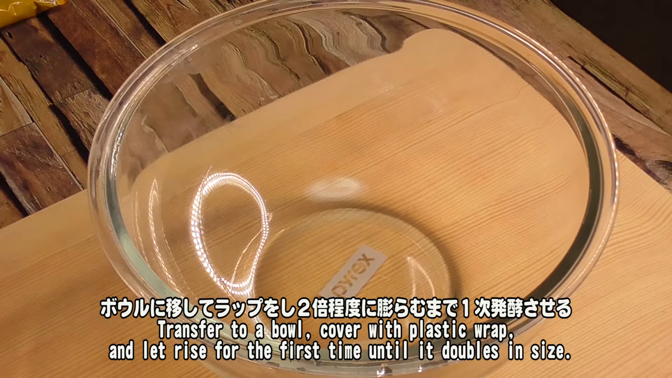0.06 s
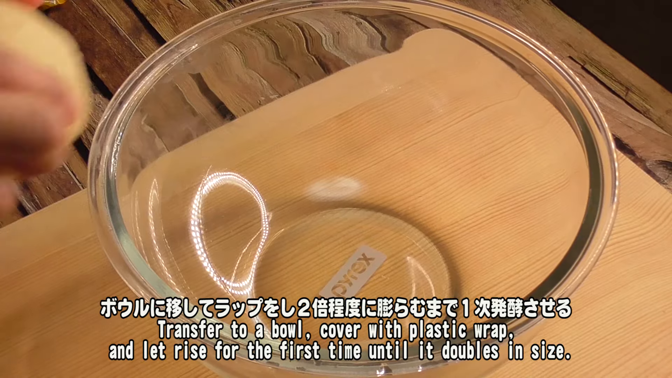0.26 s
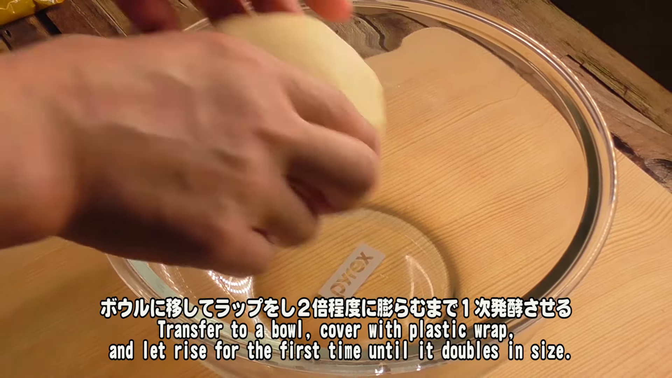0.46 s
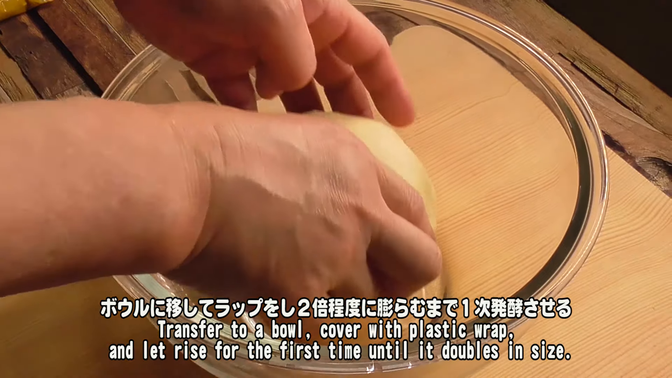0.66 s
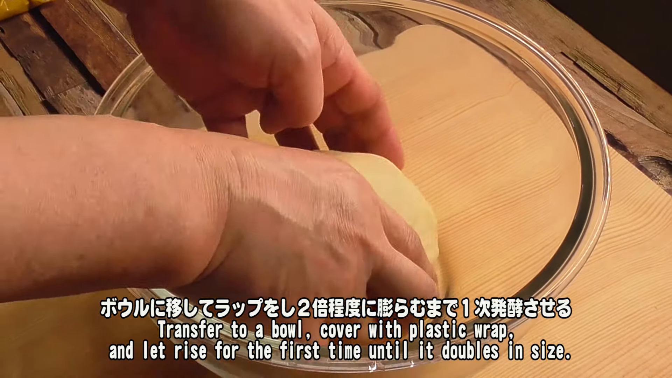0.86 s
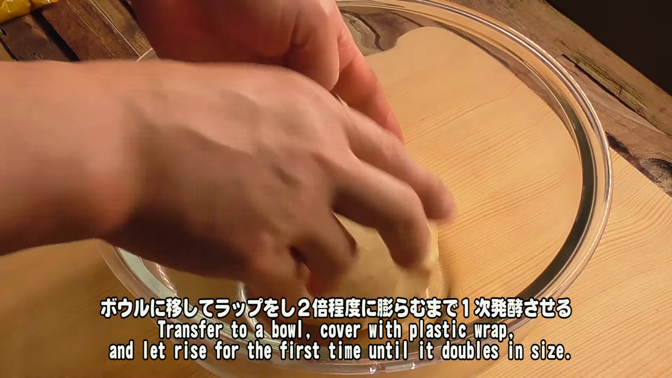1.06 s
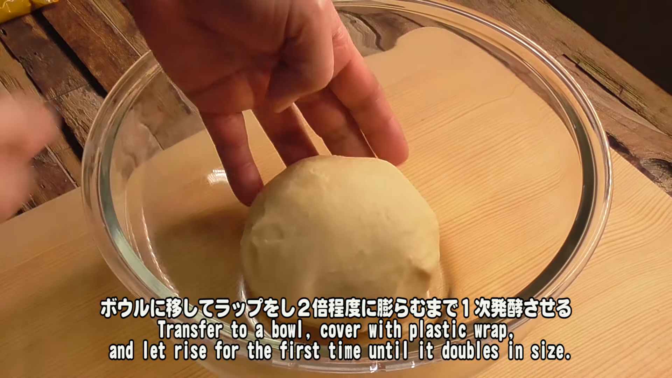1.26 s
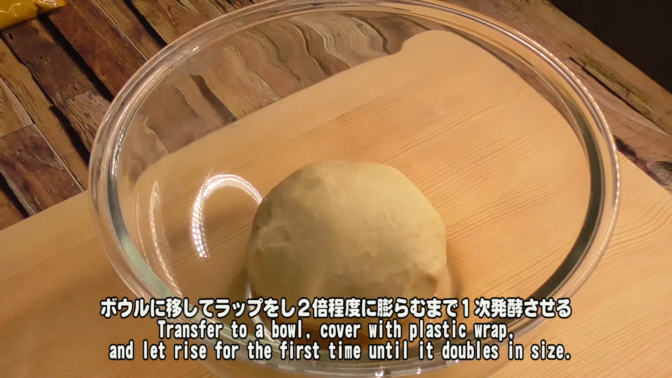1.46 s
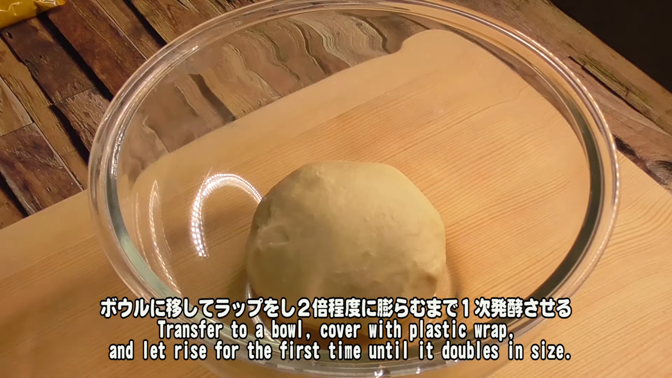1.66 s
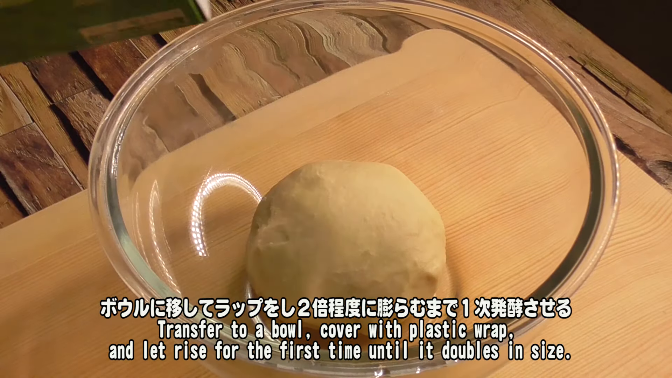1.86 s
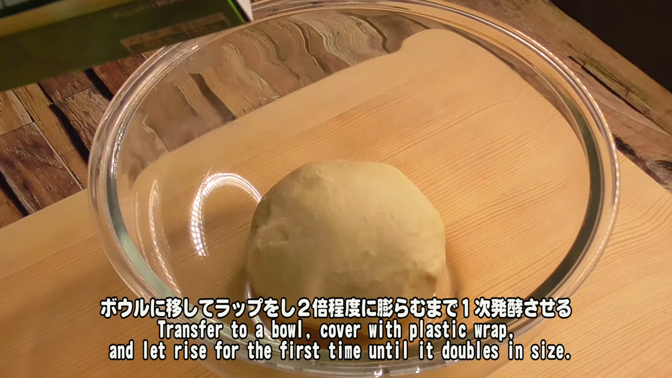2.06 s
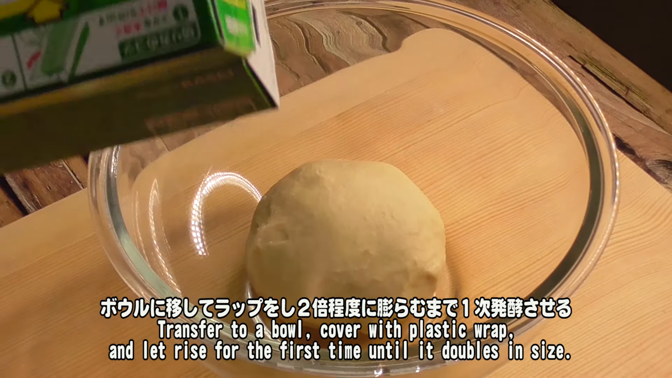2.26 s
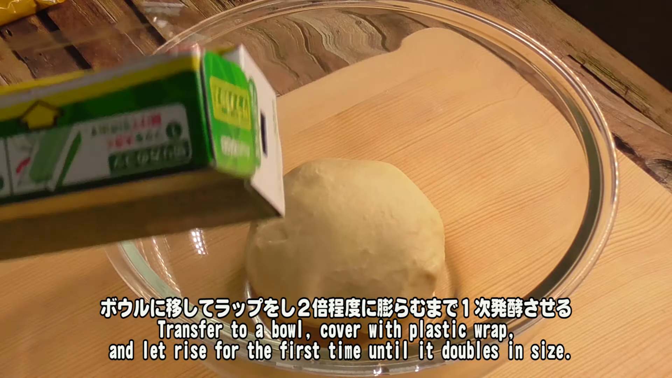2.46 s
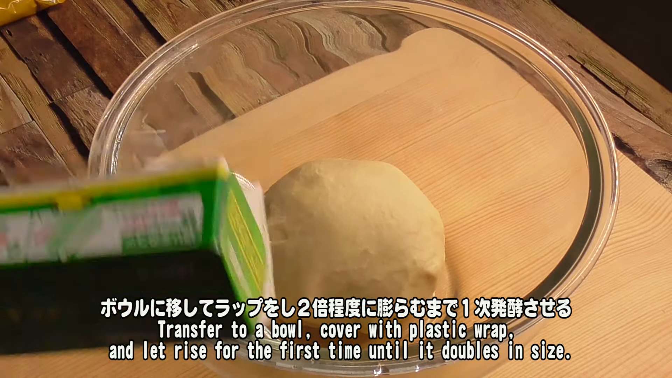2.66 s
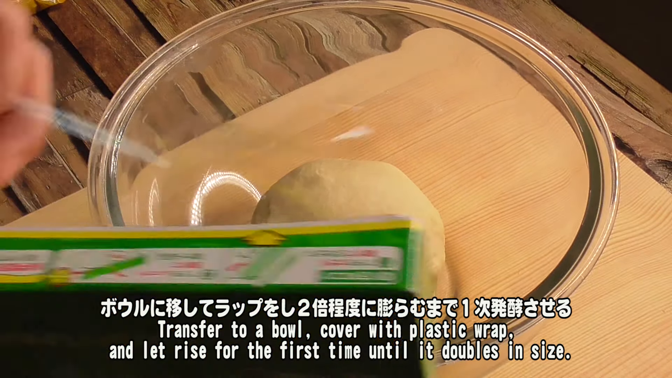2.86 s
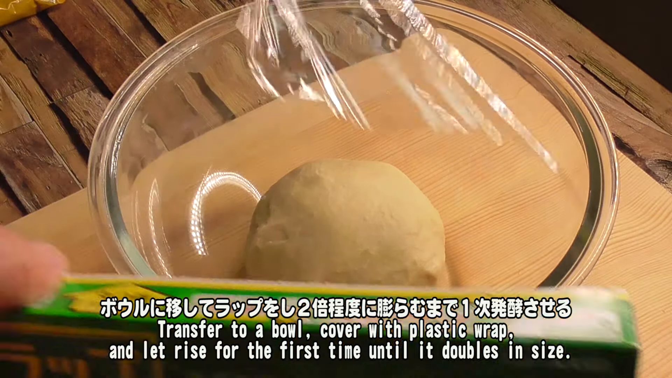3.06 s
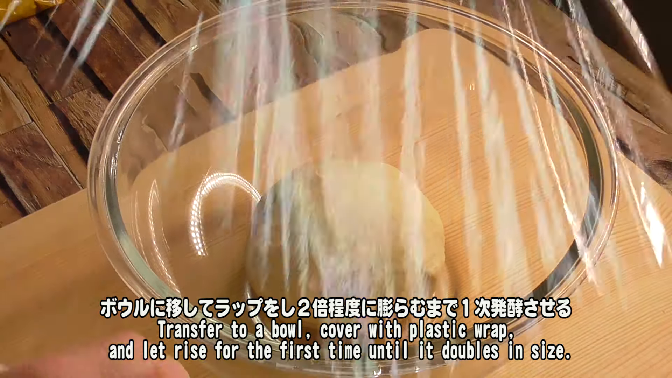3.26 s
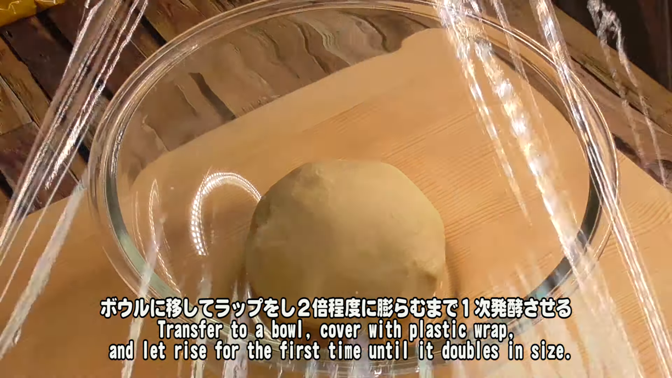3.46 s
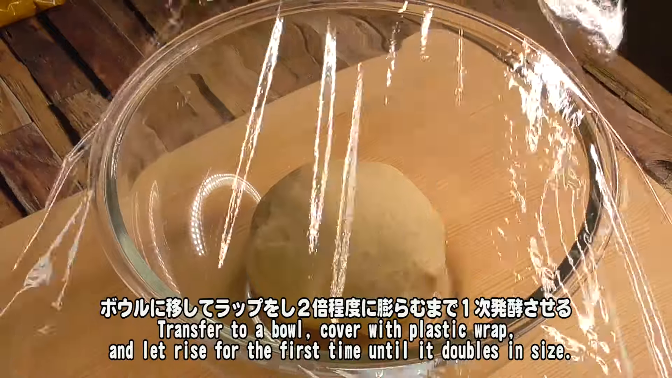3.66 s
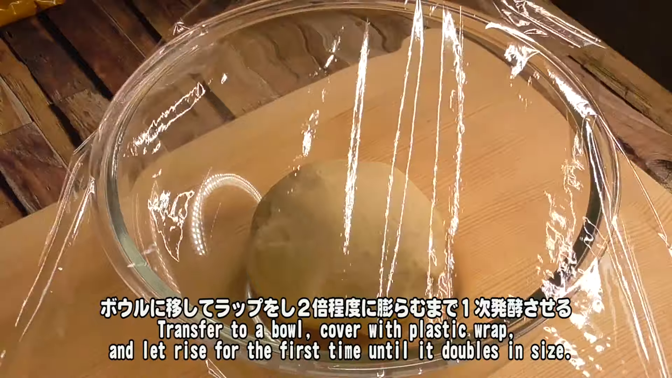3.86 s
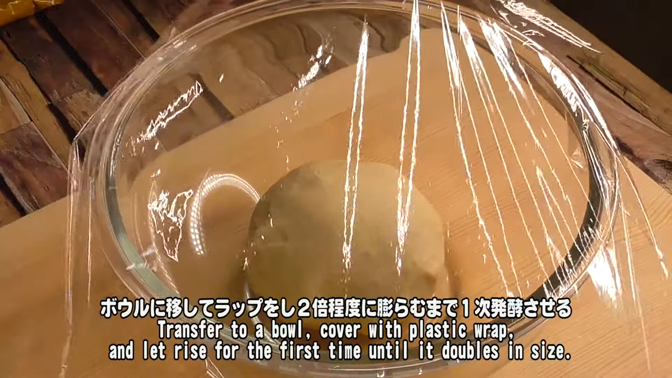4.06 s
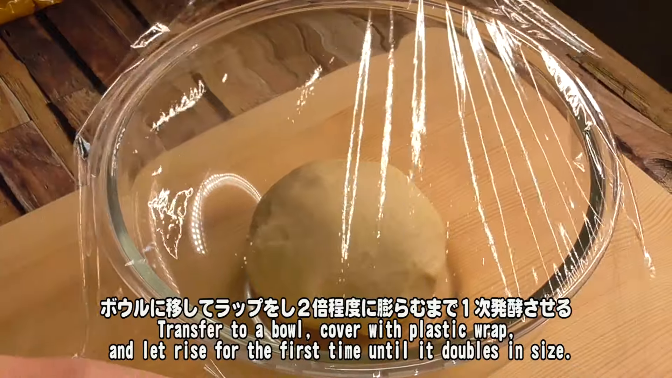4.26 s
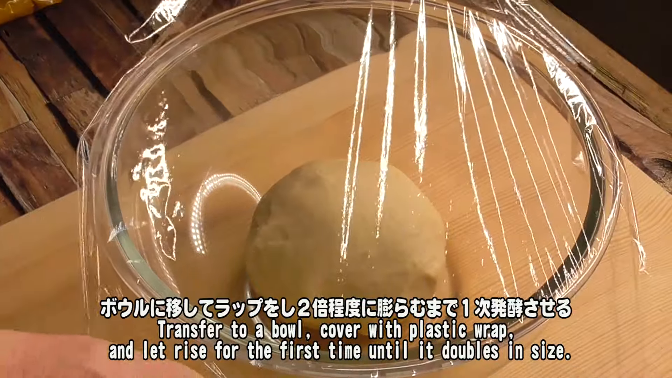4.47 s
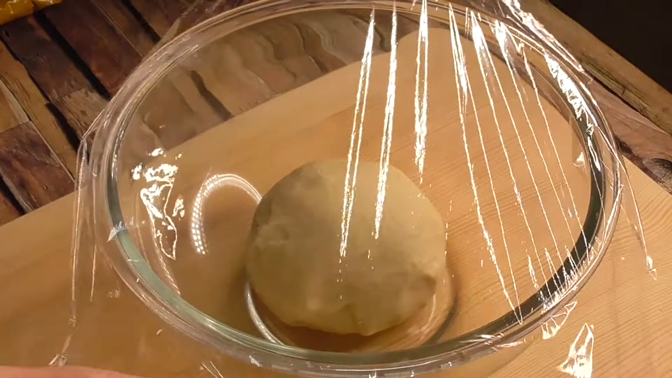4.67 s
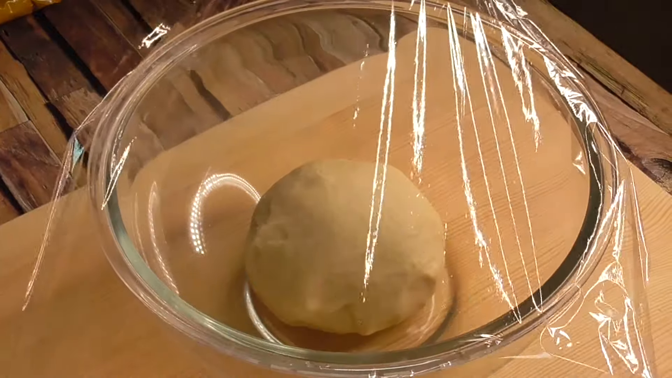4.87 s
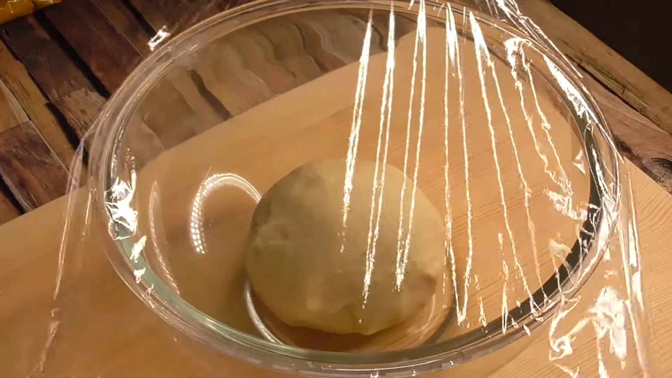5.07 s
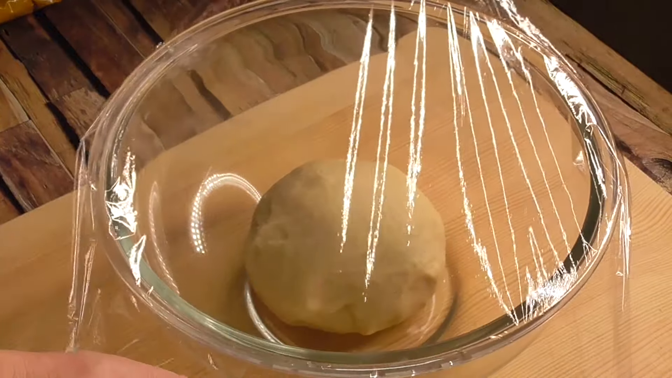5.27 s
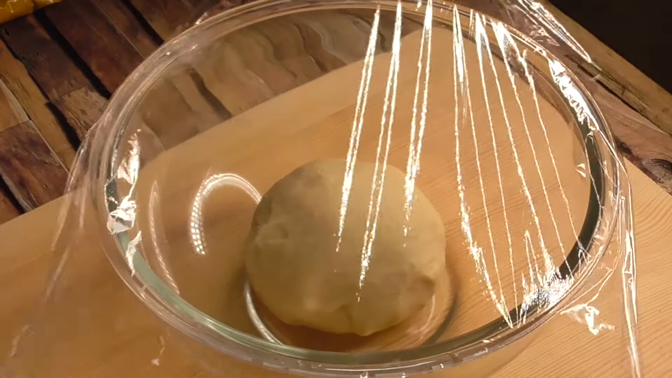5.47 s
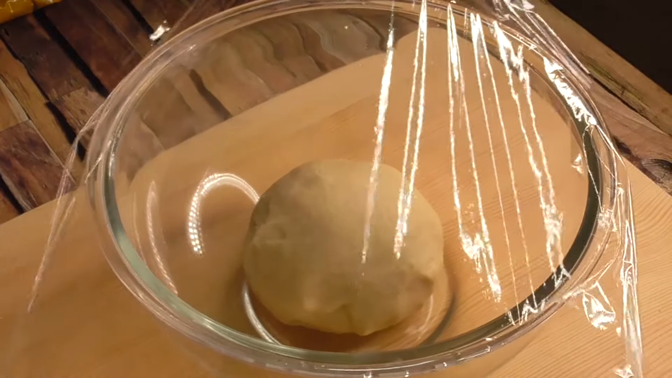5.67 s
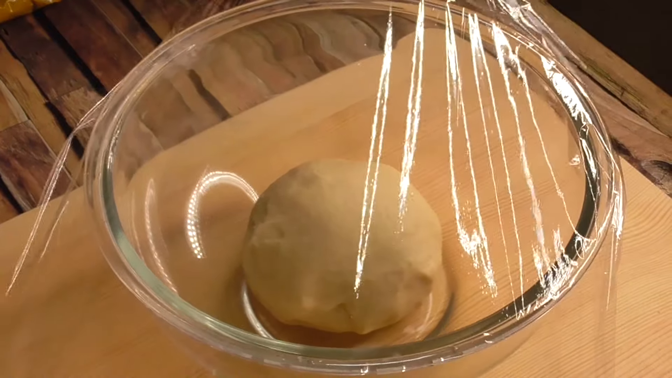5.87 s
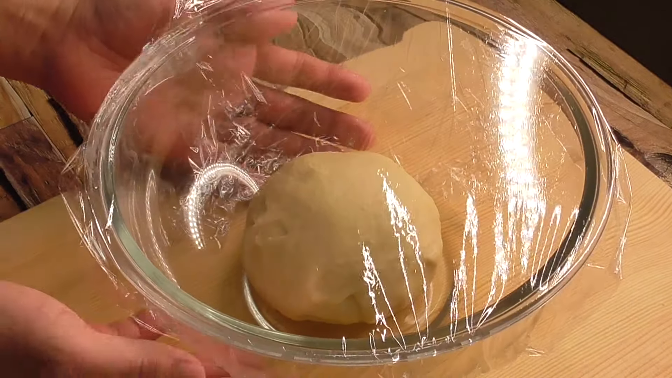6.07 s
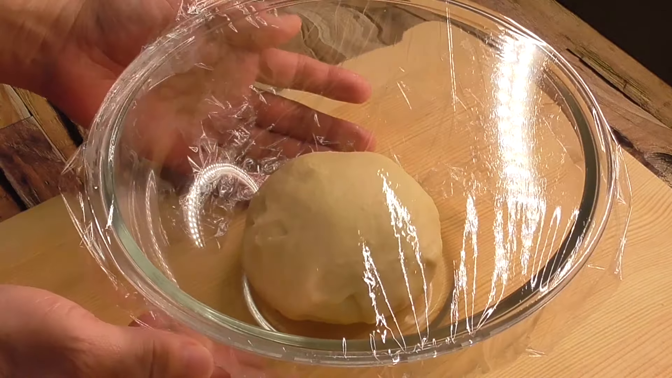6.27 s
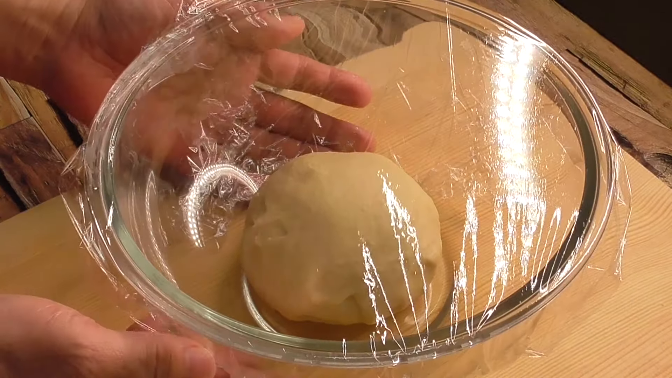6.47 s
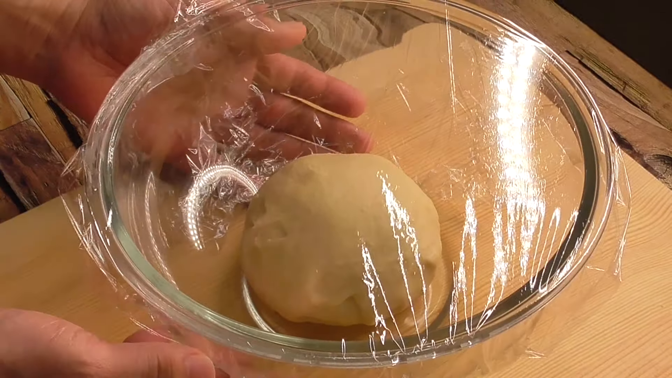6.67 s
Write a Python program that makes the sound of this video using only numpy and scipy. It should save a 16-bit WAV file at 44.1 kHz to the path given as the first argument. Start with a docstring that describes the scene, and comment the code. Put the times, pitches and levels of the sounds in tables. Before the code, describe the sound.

A quiet small kitchen with a low, soft room tone, miked closely in stereo. At 0.1 s there is a faint skin brush and soft knock; around 0.5 to 1.5 s a thin electrical buzz swells and fades, with a muffled dough bump at 0.85 s. From 1.47 s a card carton is gripped with hollow knocks and rustle, and at 2.33 s it flips open with a crack and short metallic ring. Film starts to pull at 2.45 s, then from 2.9 to 3.5 s peels in a dense, bright sizzling hiss whose tone rises and glides down. From 3.65 s come irregular crinkles and small pops, with a tighter cluster of cracks near 5 s. At 5.5 to 5.9 s the film rips loudly with sharp snaps and low thuds. Light crinkles follow at 6.05, 6.15 and 6.3 s, then near quiet with one tiny crackle at 6.7 s.

```python
"""A ball of dough is laid in a glass bowl on a wooden board: soft knocks of ringing modes and a brush of slips.
A faint electrical buzz of mains-rate ticks comes and goes, then a carton of cling film is picked up and flipped open.
The film peels off its roll with a dense hiss of tiny slips under a gliding sizzle band, crinkles as it is drawn
over the rim, rips along the cutter with sharp cracks, and crinkles last under smoothing palms.
Throughout, a quiet room of coloured noise lies below, and a small kitchen echoes the handling."""
import sys
import numpy as np
from scipy import signal
from scipy.fft import rfft, irfft, next_fast_len
from scipy.io import wavfile

SR = 44100
rng = np.random.default_rng(int(sys.argv[2]) if len(sys.argv) > 2 else 0)


def int16_out(signal):
    """Quantize to a 16-bit WAV file."""
    q = np.round(np.clip(np.atleast_2d(signal).T, -1, 1) * 32767)
    wavfile.write(sys.argv[1], SR, q.astype(np.int16))


N = 296098
TIME = np.arange(N) / SR
STEPS = np.arange(0, TIME[-1], .001)  # coarse clock for hand movements, s
BLOW_S = .005  # blow levels are stated as if the energy were packed into this time
PULL_SLIPS_PER_S = 11000  # at full peeling speed

# modes of the thud of a struck body: f/multiple of its pitch, width/Hz, level/dB
THUD_MODES = [(.5, 45.3, -6.5), (.78, 48.6, 1.5), (1, 49.7, 3), (1.35, 58.7, -1)]
# spectrum of crinkling film and of sliding skin: f/Hz, level/dB per Hz
CRINKLE_SPECTRUM = [(1800, -12.5), (2800, -8), (3600, -2), (4600, 0), (5700, -3), (7200, -0.5), (9000, -2),
                    (10500, -6), (13000, -7.5), (15500, -19)]


def from_db(db):
    """Decibels to gain."""
    return np.exp(np.asarray(db) * (np.log(10) / 20))


def rms_one(x):
    """Scale to rms 1."""
    return x / np.sqrt(np.mean(x ** 2) + 1e-20)


def in_time(rows):
    """One curve over the scene for each column after the time."""
    s, *columns = np.transpose(rows)
    return [np.interp(TIME, s, c) for c in columns]


def at_hz(points, hz):
    """Read a table on a log-frequency axis."""
    f, value = np.transpose(points)
    return np.interp(np.log(np.maximum(hz, 1)), np.log(f), value)


def coloured(x, spectrum):
    """Give x a spectrum that falls away beyond the table's ends; rms 1."""
    size = next_fast_len(N)
    hz = np.arange(size // 2 + 1) * SR / size + 1
    low_skirt = 1 + (spectrum[0][0] / hz / 2) ** 4
    high_skirt = 1 + (hz / spectrum[-1][0] / 2) ** 4
    gain = from_db(at_hz(spectrum, hz)) / np.sqrt(low_skirt * high_skirt)
    return rms_one(irfft(rfft(x, size) * gain, size)[..., :N])


def resonate(x, hz, width):
    """One resonance with unit energy gain; a wider one dies sooner."""
    r = np.exp(-np.pi * width / SR)
    poles = [1, -2 * r * np.cos(2 * np.pi * hz / SR), r * r]
    return np.sqrt((1 - r * r) / 2) * signal.lfilter([1, 0, -1], poles, x + 1e-18)


def drift(rate):
    """Slow random wander, about `rate` turns a second, drawn from knots of spread 1."""
    knots = rng.standard_normal(4000)
    return np.interp(TIME * rate, np.arange(len(knots)), knots)


def diffuse(size):
    """White stereo noise whose sides are partly alike, and partly opposed in the treble."""
    # left-right likeness: f/Hz, correlation (1 alike, -1 opposed)
    likeness = [(50, 0.5), (250, 0.64), (500, 0.45), (1000, 0.41), (2000, 0.52), (4500, 0.44),
                (9000, -0.34), (14000, -0.18)]
    mid, side = rfft(rng.standard_normal((2, size)))
    alike = np.clip(at_hz(likeness, np.arange(len(mid)) * SR / size), -1, 1)
    both = np.sqrt(1 + alike) * mid + np.sqrt(1 - alike) * side * [[1], [-1]]
    return irfft(both, size) / np.sqrt(2)


def blows(times, levels_db, modes, buckle_s=BLOW_S, after=0, detune=0, pan_db=0, scale=1, polarity=-1, size=3000):
    """Each blow is a click and a quick dying run of smaller slips, ringing modes that shift with the grip.
    Rows: left, right, and the sound sent to the walls, which the click alone drives."""
    out, t = np.zeros((3, N + size)), np.arange(size) / SR
    for s, db, stretch in zip(times, levels_db, scale * np.ones(len(times))):
        click = 1. * (t == 0)
        run = click + after * rng.standard_normal(size) * np.exp(-t / buckle_s)
        # a small body radiates little below its lowest mode
        high_pass = signal.butter(2, modes[0][0] * stretch / 2, "high", fs=SR, output="sos")
        push = signal.sosfilt(high_pass, [run, run, click])
        rings = 0
        for k, (hz, width, mode_db) in enumerate(modes):
            pitch = min(hz * stretch * np.exp(detune * rng.normal()), SR / 2 - 1000)
            aim_db = pan_db * rng.normal() * np.array([[1], [-1], [0]])  # each mode beams its own way
            gain = polarity ** k * from_db(mode_db + 2.1 * rng.normal() + aim_db)
            rings = rings + gain * resonate(push, pitch, width)
        left, right, far = np.sum(rings ** 2, axis=1)
        energy = np.array([[left + right], [left + right], [2 * far]]) / 2
        at = max(int(s * SR), 0)
        out[:, at:at + size] += from_db(db) * rings * np.sqrt(BLOW_S * SR / energy)
    return out[:, :N]


def grains(per_s, spread_db, pan_db, clump_db=2.0):
    """Random tiny slips of uneven size that come in clumps; rows left, right and towards the walls."""
    chance = np.clip(per_s / SR, 1e-4, 1)
    uneven_db = spread_db * np.minimum(rng.exponential(1, N), 3)
    sizes = from_db(uneven_db + clump_db * drift(70)) * rng.choice([-1, 1], N)
    clicks = (rng.random(N) < chance) * sizes / np.sqrt(chance)
    return rms_one(clicks * from_db(pan_db * rng.standard_normal(N) * [[1], [-1], [0]]))


def quiet_room():
    """The room's steady bed: diffuse noise, strongest in the low mids."""
    # spectrum: f/Hz, level/dB per Hz
    ambience = [(25, -15), (60, -13), (120, -0.5), (200, -1.5), (290, 4.5), (370, -5.5), (480, -3.5),
                (950, -8), (1500, -13), (2200, -19.5), (6000, -20.5), (9000, -16.5), (13000, -16.5),
                (16000, -25.5)]
    return from_db(-57) * coloured(diffuse(N), ambience)


def echoes(first_echo_s=0.0022, build_s=0.00057, size=32768):
    """Dense wall echoes that die away band by band."""
    # decay of the kitchen: f/Hz, time to fall by 60 dB/s
    decay_times = [(100, 0.36), (400, 0.18), (1200, 0.38), (4500, 0.58), (9000, 0.38), (15000, 0.35)]
    # echo strength: f/Hz, level/dB against the direct sound
    echo_levels = [(100, -3.5), (400, -3.5), (1200, -1), (4500, -5), (9000, -1.5), (15000, 0.5)]
    t, hz = np.arange(size) / SR, np.arange(size // 2 + 1) * SR / size
    noise, centres, tail = rfft(diffuse(size)), np.geomspace(80, 16000, 12), 0
    onset = 1 - np.exp(-np.maximum(t - first_echo_s, 0) / build_s)
    for centre, share in zip(centres, np.eye(len(centres))):
        fade = onset * from_db(-60 * t / at_hz(decay_times, centre))
        band = irfft(noise * at_hz(np.c_[centres, share], hz), size)
        tail = tail + from_db(at_hz(echo_levels, centre)) * band * fade / np.sqrt(np.sum(fade ** 2))
    return tail


def kitchen(x, count=4, spots_per_s=27):
    """The sounding spot moves round a few places in turn, crossfading, and each has its own echoes."""
    out = 0
    for k in range(count):
        away = np.abs((TIME * spots_per_s + k) % count - count / 2)
        share = np.cos(np.pi / 2 * np.minimum(away, 1))
        out = out + signal.oaconvolve((x * share)[None], echoes(), axes=1)[:, :N]
    return out


def buzz(mains_hz=60):
    """One small tick in every mains cycle with a little fizz after it, through resonances that waver."""
    # loudness of the buzz: t/s, level/dB
    buzz_levels = [(.5, -85), (.59, -69), (.68, -65), (.82, -70.5), (1.15, -67.5), (1.45, -68), (1.6, -94)]
    # resonances: f/Hz, width/Hz, level/dB
    buzz_modes = [(2400, 460, 7.5), (3900, 154, 6.5), (4800, 300, 2)]
    since = TIME % (1 / mains_hz)
    ticks = np.diff(since, prepend=0) < 0
    push = ticks + 0.25 * rng.standard_normal(N) * np.exp(-since / 0.0039)
    rings = 0
    for k, (hz, width, db) in enumerate(buzz_modes):
        rings = rings + (-1) ** k * from_db(db + 2 * drift(20.2)) * resonate(push, hz, width)
    return from_db(in_time(buzz_levels)[0]) * rms_one(rings)


def board():
    """The wooden board booms softly in two low modes under dough, bowl and hands."""
    # weight coming down: t/s, level/dB
    bumps = [(.135, -55), (.845, -55), (3.01, -45.5), (3.055, -54), (5.796, -41.5), (5.914, -41.5)]
    # modes: f/Hz, width/Hz, level/dB
    board_modes = [(65.5, 14, -9), (120, 41, -9)]
    s, db = np.transpose(bumps)
    return blows(s, db, board_modes, size=6000)


def brush():
    """Hands brush the dough: skin slides over dough and board in many tiny slips."""
    # loudness of the brushing: t/s, level/dB
    brush_levels = [(0, -65.5), (.11, -57.5), (.17, -86), (.3, -100)]
    slips = grains(4000, spread_db=2.0, pan_db=3.0)
    return from_db(in_time(brush_levels)[0]) * coloured(slips, CRINKLE_SPECTRUM)


def crumples():
    """Dough, card or taut film gives way: a short stutter of slips rings one patch at its own low pitch."""
    # start t/s, length/s, pitch f/Hz, drive level/dB
    patches = [(.843, .025, 616, -58), (1.727, .03, 570, -48), (2.99, .035, 435, -38),
               (3.667, .025, 620, -45), (4.627, 0.043, 883, -41), (4.83, .045, 513, -48),
               (5.121, 0.038, 592, -44)]
    out, slips = 0, grains(1100, spread_db=0.5, pan_db=1.5)
    for s, length, hz, db in patches:
        gain = from_db(db) * (TIME > s) * (TIME < s + length)
        soft = resonate(gain * slips, hz, hz) * np.sqrt(np.pi * hz / SR)
        out = out + resonate(soft, hz, width=98)
    return out


def carton():
    """Knocks of dough, hands and carton: a low thud, the hollow ring of card and a dry crack."""
    # t/s, thud f/Hz, then before the trims: thud level/dB, ring level/dB, ring pitch ratio, crack level/dB
    knocks = [(0.1271, 160, -58, -55.5, 0.91, -54.5), (0.8415, 465, -52.5, -55, 0.49, -51.5),
              (1.4712, 302, -50, -38, 1.08, -45), (1.4969, 392, -47, -27, 1.18, -66),
              (1.7074, 384, -58, -45, 1.36, -49), (1.9536, 372, -39, -33.5, 0.94, -35.5),
              (2.015, 265, -34, -47, 0.82, -64), (2.0959, 161, -43.5, -46, 1.9, -52),
              (2.1838, 294, -42, -58, 1.1, -72), (2.232, 266, -48.5, -53, 0.91, -56),
              (2.3284, 343, -40, -33, 0.99, -28), (2.332, 340, -31.5, -30.5, 0.97, -27),
              (2.6269, 360, -37, -37, 1.2, -41.5), (2.6795, 368, -36, -37.5, 0.96, -65),
              (2.7189, 452, -30, -23.5, 0.96, -60), (2.7671, 423, -34.5, -38.5, 0.76, -44.5),
              (2.9426, 380, -41.5, -47, 0.99, -42), (2.9827, 367, -40, -40, 1.2, -40.5),
              (2.992, 302, -33, -33, 1.07, -39), (3.0516, 374, -44, -23, 1.03, -52),
              (3.578, 370, -47, -44.5, 0.91, -45.5), (4.6258, 440, -35, -35.5, 0.94, -37.5),
              (5.7946, 330, -30.5, -29, 0.944, -24.5), (5.913, 302, -25, -32, 1.13, -50)]
    # hollow ring of card: f/Hz at pitch ratio 1, width/Hz, level/dB
    ring_modes = [(763, 280, -5), (967, 94, 6.5), (1215, 180, 4.5), (1340, 630, -2), (2050, 120, -12.5),
                  (2270, 160, -10)]
    # dry crack of card: f/Hz, width/Hz, level/dB
    crack_modes = [(2700, 3700, 1), (4600, 670, 5), (5600, 860, 1.5), (7600, 2300, 3), (10500, 5200, -3)]
    s, thud_hz, thud_db, ring_db, ring_ratio, crack_db = np.transpose(knocks)
    thud = blows(s, thud_db, THUD_MODES, buckle_s=0.0091, after=0.057, detune=0.044, pan_db=1.1, scale=thud_hz)
    ring = blows(s, ring_db, ring_modes, buckle_s=0.002, after=0.26, detune=0.037, pan_db=3.5,
                 scale=ring_ratio, polarity=0.95)
    # card gives under the blow, which softens its ring
    ring = signal.sosfilt(signal.butter(4, 2280, fs=SR, output="sos"), ring)
    crack = blows(s, crack_db, crack_modes, buckle_s=0.0028, after=0.51, detune=0.023, pan_db=3.0)
    return from_db(1.6) * thud + from_db(4.0) * ring + from_db(2.5) * crack


def cutter(lid_s=2.332, lid_db=-25.5):
    """The lid flips open and leaves the toothed steel cutter strip ringing in narrow modes."""
    # modes: f/Hz, width/Hz, level/dB
    cutter_modes = [(1175, 7.3, -5.5), (1258, 15, -10), (2250, 50, -4)]
    return blows([lid_s], [lid_db], cutter_modes, size=9000)


def film_cracks():
    """A crease pops or the film tears on the cutter teeth: a sharp crack that plucks sheet and carton."""
    # t/s, then before the trims: thud level/dB, sheet ring level/dB, crack level/dB
    cracks = [(2.4902, -57, -40, -42), (2.8375, -45.5, -40, -38), (3.743, -46, -60, -45),
              (3.7808, -51, -42, -49), (3.9872, -61, -47, -46.5), (4.141, -49, -56, -47),
              (4.2307, -50, -46, -45.5), (4.2795, -50, -46.5, -41), (4.324, -57, -71, -46),
              (4.4679, -47, -37.5, -40), (4.5353, -49, -62, -41), (4.604, -52, -49, -36),
              (4.6937, -45.5, -63, -38), (4.914, -60, -59, -40), (4.9226, -48, -58, -33.5),
              (4.9338, -44, -33.5, -29), (4.9875, -45, -36.5, -30), (4.9973, -49, -38, -30),
              (5.0053, -33.5, -30.5, -26), (5.0166, -39, -38, -38), (5.0659, -39, -30.5, -27.5),
              (5.199, -66.5, -63, -39.5), (5.2466, -67, -54, -40.5), (5.4687, -61, -49, -49),
              (5.487, -49, -69.8, -45.5), (5.5253, -58, -46.5, -28.5), (5.5473, -59, -60, -37.5),
              (5.587, -29, -22.5, -24), (5.5933, -48, -24, -19.5), (5.657, -54, -33, -33.5),
              (5.702, -52, -36, -32), (5.715, -50, -33, -30.5), (5.727, -57, -36, -30),
              (5.737, -58.9, -50, -35), (5.7418, -56, -47, -34), (5.7785, -40, -33, -35),
              (5.789, -38.5, -30, -30), (5.7935, -25.5, -23.5, -25.5), (5.8227, -53, -34, -34),
              (5.8451, -56, -30, -28.5), (5.8786, -58, -53, -30.5), (5.905, -40, -39, -30),
              (6.6836, -59, -55, -47.5)]
    # ring of the sheet: f/Hz, width/Hz, level/dB
    sheet_modes = [(720, 500, 0), (947, 145, 1), (1265, 67, -1), (1595, 200, -8.5), (2160, 750, -11.5)]
    # crack of the film: f/Hz, width/Hz, level/dB
    crack_modes = [(2970, 1700, -12), (4740, 1350, -4), (7160, 1900, 1.5), (9140, 1900, 2),
                   (12750, 2300, -5.5)]
    s, thud_db, ring_db, crack_db = np.transpose(cracks)
    thud = blows(s, thud_db, THUD_MODES, buckle_s=0.0064, after=0.034, detune=0.073, pan_db=2.0, scale=354.5)
    ring = blows(s, ring_db, sheet_modes, buckle_s=0.0032, after=0.06, detune=0.06, pan_db=1.2)
    crack = blows(s, crack_db, crack_modes, buckle_s=0.0018, after=0.2, detune=0.039, pan_db=1.5)
    return from_db(-0.5) * thud + from_db(-1.0) * ring + from_db(3.0) * crack


def stroke(start, length, attack_s, release_s, sag_db_per_s, levels_db):
    """One movement of the hands: it gathers speed, slackens slowly and stops; one row per level."""
    t = STEPS - start
    held = np.clip(t / attack_s, 0, 1) * from_db(-sag_db_per_s * np.clip(t, 0, length))
    return from_db(levels_db)[:, None] * held * np.exp(-np.clip(t - length, 0, 1) / release_s)


def gripping():
    """Gains of skin hiss, card rustle and rub as hands take hold of the carton and slide on it."""
    # start t/s, length/s, then before the film trims: rustle level/dB, rub level/dB, hiss level/dB
    grips = [(1.463, 0.023, -34, -44, -48), (1.505, 0.16, -44.5, -52.5, -52.5),
             (1.685, 0.11, -52, -54, -51), (1.962, 0.12, -53, -53, -53.5), (2.107, 0.18, -64, -62.5, -59),
             (2.33, 0.068, -39, -49, -52.5), (2.681, 0.086, -48, -48, -52.5)]
    return sum(stroke(s, length, 0.013, .035, 23.5, [hiss_db, rustle_db, rub_db])
               for s, length, rustle_db, rub_db, hiss_db in grips)


def pulling():
    """Gains of hiss, rustle and rub as the film comes off the roll."""
    # start t/s, length/s, time to full speed/s, hiss level/dB before the film trims
    pulls = [(2.455, 0.14, 0.089, -41.5), (2.806, 0.024, 0.015, -41.5), (2.876, 0.62, 0.22, -37.5)]
    return sum(stroke(s, length, rise_s, .055, 0, [db, db - 3, db - 9.5])
               for s, length, rise_s, db in pulls)


def draping():
    """Gains of crinkle, rustle and rub as the loose sheet is drawn over the rim."""
    # start t/s, length/s, then before the film trims: crinkle level/dB, sheet rustle level/dB
    drapes = [(3.651, 0.037, -53.5, -43.5), (3.736, 0.084, -48, -45), (3.847, 0.21, -55, -51.5),
              (4.033, 0.17, -51, -51.5), (4.223, 0.17, -54.5, -57.5), (4.466, 0.15, -53, -50.5),
              (4.611, 0.049, -46.5, -46), (4.698, .08, -52.5, -52.5), (4.797, 0.033, -43, -47),
              (4.852, 0.11, -50, -50), (4.998, .17, -45.5, -46.5), (5.203, 0.092, -56.5, -56),
              (5.369, 0.13, -60.5, -61), (5.481, 0.12, -50, -50)]
    return sum(stroke(s, length, .025, 0.021, 15.5, [db, rustle_db, rustle_db - 6])
               for s, length, db, rustle_db in drapes)


def ripping():
    """Gains of crinkle, rustle and rub as the film rips along the cutter."""
    # start t/s, length/s, crinkle level/dB before the film trims
    rips = [(5.579, .18, -33.5), (5.843, .05, -34.5)]
    return sum(stroke(s, length, 0.0064, .012, 21.5, [db, db - 3, db - 13.5])
               for s, length, db in rips)


def smoothing():
    """Gains as palms smooth the film against the glass, where it only crinkles."""
    # start t/s, length/s, crinkle level/dB before the film trims
    smoothings = [(6.04, 0.057, -47), (6.155, 0.042, -55), (6.3, 0.062, -45.5)]
    return sum(stroke(s, length, 0.023, 0.042, 7, [db, -np.inf, -np.inf])
               for s, length, db in smoothings)


def movements():
    """Each kind of movement: (gains of crinkle, rustle and rub; slips per s at its strongest; brightness dB)."""
    pull = pulling()
    speed_db = 20 * np.log10(np.maximum(pull[0] / pull[0].max(), 1 / 10))
    pull_bright_db = 1.5 + 0.65 * speed_db  # a weaker pull loses top
    return [(gripping(), 5000, 1), (pull, PULL_SLIPS_PER_S, pull_bright_db),
            (draping(), 1500, 3), (ripping(), 3500, -1), (smoothing(), 1300, -2)]


def handling():
    """All movements together: grain and brightness are averages weighted by each one's strength."""
    gains, per_s, bright_db, total = 0, 0, 0, 0
    for gain, top_per_s, movement_bright_db in movements():
        strength = gain[0] + 1e-9
        gains, total = gains + gain, total + strength
        # a stronger movement slips more often
        slip_rate = top_per_s * np.maximum(strength / strength.max(), 1 / 10) ** .7
        per_s = per_s + strength * slip_rate
        bright_db = bright_db + strength * movement_bright_db
    return [np.interp(TIME, STEPS, control) for control in (*gains, per_s / total, bright_db / total)]


def sizzle():
    """The peeling line hisses in a gliding band over one steady ring; the roll unwinds unevenly."""
    # pitch of the line, up with speed and down as the free sheet lengthens: t/s, f/Hz
    line_pitch = [(2.88, 8000), (3.08, 11000), (3.27, 7800), (3.52, 7140)]
    slips = grains(PULL_SLIPS_PER_S, spread_db=2.5, pan_db=2.0, clump_db=2.0)
    # shift the band down to 0 Hz, low-pass it there and shift it back
    turn = np.exp(2j * np.pi * np.cumsum(in_time(line_pitch)[0]) / SR)
    half_band = signal.butter(2, 3100 / 2, fs=SR, output="sos")
    gliding = np.real(turn * signal.sosfilt(half_band, slips / turn))
    steady = resonate(slips, hz=4540, width=850)
    hiss = np.interp(TIME, STEPS, pulling()[0])
    gain = hiss * np.sqrt(hiss / hiss.max()) * from_db(drift(14))  # favours full speed
    return gain * (from_db(-5) * rms_one(gliding) + from_db(-8) * rms_one(steady))


def film():
    """Clinging layers part in countless slips: a smooth hiss off the roll, separate crackles when slow."""
    # spectra of loose rustle and of rubbing: f/Hz, level/dB per Hz
    rustle_spectrum = [(400, -31), (620, -1), (800, 3.5), (1050, 1.5), (1350, 2.5), (1800, -12.5),
                       (2300, -10), (3000, -18.5), (4500, -29)]
    rub_spectrum = [(40, -23), (80, -13.5), (140, -1), (230, -2), (300, -4), (450, 7), (600, -7.5),
                    (900, -30)]
    crinkle_gain, rustle_gain, rub_gain, per_s, bright_db = handling()
    clumping = 4.36 / (1 + per_s / 5000)  # fast peeling evens out
    slips = grains(per_s, spread_db=2.5, pan_db=1.5, clump_db=clumping)
    crinkle = coloured(slips, CRINKLE_SPECTRUM)
    # brightness raises or lowers the very top: taut, fast-peeling film sizzles more
    dull = signal.sosfiltfilt(signal.butter(2, 9000, fs=SR, output="sos"), crinkle)
    crinkle = dull + from_db(bright_db) * (crinkle - dull)
    rustle = coloured(slips, rustle_spectrum)
    rub = coloured(grains(per_s, spread_db=2.5, pan_db=0.5, clump_db=2.5), rub_spectrum)
    return from_db(1.26) * crinkle_gain * crinkle + from_db(-3.5) * rustle_gain * rustle + rub_gain * rub


def scene():
    """Close handling, its echoes, the buzz and the quiet room."""
    knocking = board() + carton() + cutter()
    touching = brush() + crumples()
    wrapping = film_cracks() + sizzle() + film()
    left, right, to_walls = knocking + touching + wrapping
    return np.array([left, right]) + kitchen(to_walls) + buzz() + quiet_room()


def record(dry, edge_hz=10500, left_top_db=-4.0, right_top_db=-1.0, balance_db=0.0):
    """Two microphones, the left one duller at the very top; the band ends steeply."""
    low = signal.sosfilt(signal.butter(1, min(edge_hz, SR / 2 - 1000), fs=SR, output="sos"), dry)
    shelved = low + (dry - low) * from_db([[left_top_db], [right_top_db]])
    heard = shelved * from_db([[balance_db], [-balance_db]])
    return signal.sosfilt(signal.ellip(10, .2, 70, 15800, fs=SR, output="sos"), heard)


dry = scene()
out = record(dry)
int16_out(out)
```